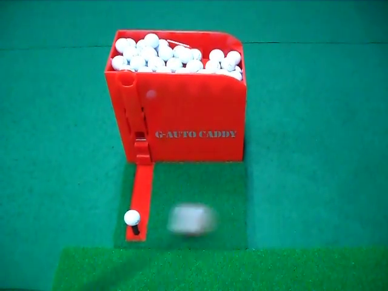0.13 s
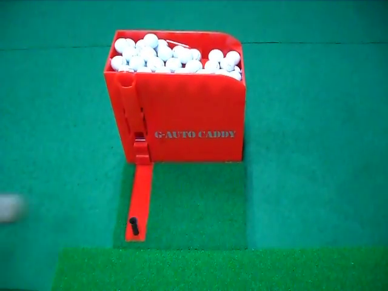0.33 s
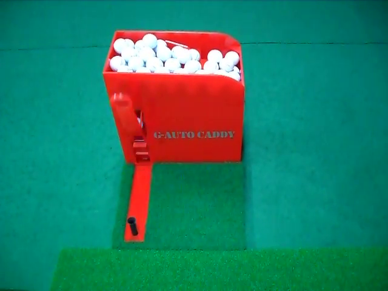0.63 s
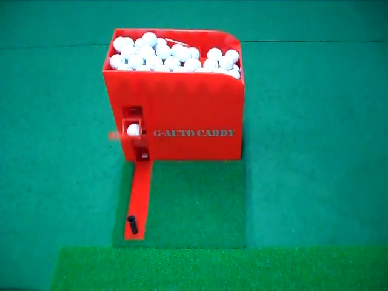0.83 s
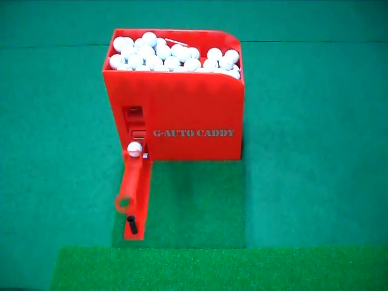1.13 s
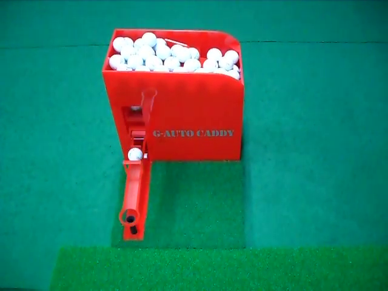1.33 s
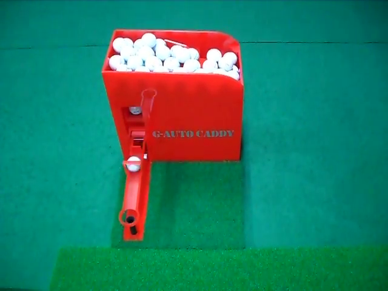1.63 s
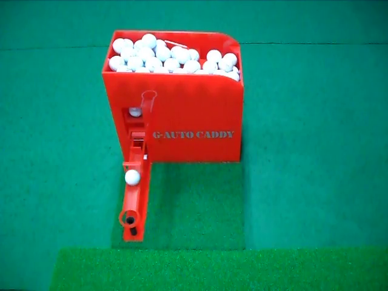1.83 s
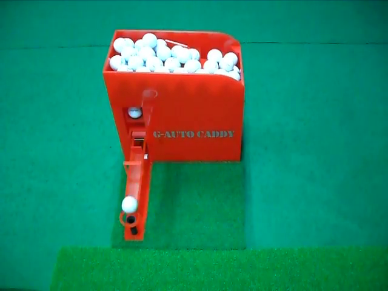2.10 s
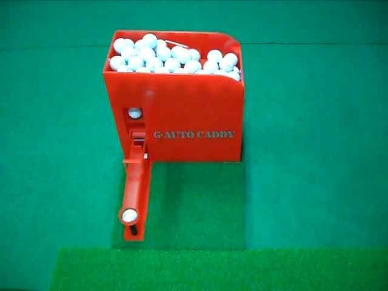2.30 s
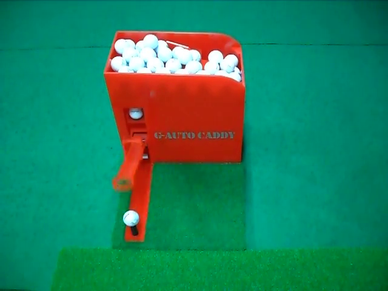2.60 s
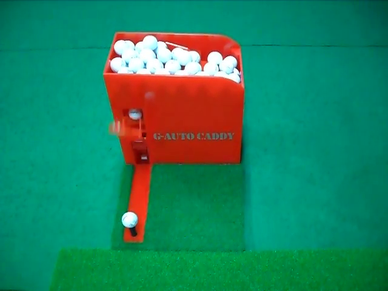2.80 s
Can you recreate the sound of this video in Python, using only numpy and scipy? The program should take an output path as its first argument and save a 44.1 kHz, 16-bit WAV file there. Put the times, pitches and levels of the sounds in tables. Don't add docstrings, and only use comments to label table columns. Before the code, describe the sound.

A golf club hits a ball with a loud, sharp crack and short metallic ring at 0.2 seconds, echoing in a hard-walled room. The ball thuds dully into a net at 0.4. A hollow plastic dispenser clunks at 0.67, its arm clatters from 1.13 to 1.5, a ball rolls faintly, bright clacks land around 2.2 to 2.3, and the returning arm rattles from 2.5, ending with a tick at 2.94. Soft hiss and low rumble continue.

```python
import sys
import numpy as np
from scipy import signal
from scipy.fft import rfft, irfft
from scipy.io import wavfile

SR = 44100
rng = np.random.default_rng(int(sys.argv[2]) if len(sys.argv) > 2 else 0)


def to_wav(sig):
    pcm = np.clip(np.atleast_2d(sig), -1, 1) * 32767
    pcm = np.round(pcm).astype(np.int16)
    wavfile.write(sys.argv[1], SR, pcm.T)


def boost(x):
    u = np.asarray(x, float) / 20
    return 10 ** u


N = 130095

# frequency in [Hz], level in [dB], t60 in [s].
SHELL_MODES = [(325, -5.5, 0.17), (401, -6.5, 0.12), (441, 1, 0.032), (545, -3, 0.098), (607, -1, 0.042),
               (761, 0, 0.04), (865, 2.5, 0.017), (953, -8, 0.13), (1148.5, -1, 0.025),
               (1367, -19.5, 0.013), (1488, -8.5, 0.037), (1744, -36, 0.013), (2227, -20, 0.044),
               (2700, -17.5, 0.01)]
# frequency in [Hz], level in [dB], t60 in [s].
BOX_MODES = [(201, -2.5, 0.14), (218.6, -2, 0.1), (263, -13.5, 0.19), (150, -22.5, 0.24), (82, -24, 0.063)]


def rms_one(x):
    return x / np.sqrt(np.mean(x ** 2) + 1e-20)


def at_hz(points, hz):
    table_hz, value = np.transpose(points)
    return np.interp(np.log(hz), np.log(table_hz), value)


def clicks(start_s, sizes):
    out = np.zeros(N)
    place = np.clip((np.asarray(start_s) * SR).astype(int), 0, N - 1)
    np.add.at(out, place, sizes)
    return out


def ring(x, hz, t60):
    r = boost(-60 / (t60 * SR))
    w = 2 * np.pi * hz / SR
    return signal.lfilter([0, np.sin(w)], [1, -2 * r * np.cos(w), r * r], x + 1e-18)


def band(x, low_hz, high_hz):
    edges_hz = [low_hz, min(high_hz, .45 * SR)]
    return signal.sosfilt(signal.butter(2, edges_hz, "band", fs=SR, output="sos"), x)


def club():
    # frequency in [Hz], level in [dB], t60 in [s].
    head_modes = [(830, -12, .01), (1200, 2, .01), (1437, -3, .012), (1780, -5, .009), (2250, -7, .01),
                  (3386, -17, .04), (3680, -6, .007), (4624, -22, .03), (5076, -6, .06), (6328, -3, .14),
                  (6350, -3, .09), (6815, -12, .05), (7730, -10, .1), (8400, -9, .01)]
    strike_s, squeeze_s = .2078, .0022
    ring_db, crack_db, body_db = -33.5, -16, -18.5
    touch = clicks([strike_s], 1.)
    release = clicks(strike_s + squeeze_s * np.array([0, .7, 1.2]), boost([-16, -11, 0]))

    low = 0
    for k, (hz, db, t60) in enumerate(head_modes[:7]):
        low = low + (-1) ** k * boost(db) * ring(release, hz, t60)
    high = 0
    for hz, db, t60 in head_modes[7:]:
        high = high + boost(db) * ring(band(touch, .9 * hz, 1.1 * hz), hz, t60)

    crack = boost(ring_db) * low + boost(crack_db) * band(release, 1000, 8000)
    body = 10 * boost(body_db) * band(release, 214, 600)
    return crack, boost(ring_db) * high, body


def net():
    # centre in [s], level in [dB], softness in [ms].
    thuds = [
        (0.4011, -22, 0.27),
        (0.417, -36.5, 0.71),
        (0.488, -44, 1.24),
        (0.412, -41, 1),
        (0.802, -49.5, 2.52),
        (1.325, -48, 2.2),
        (2.472, -54, 1.3),
    ]
    t = np.arange(N) / SR
    push = np.zeros(N)
    for centre_s, db, soft_ms in thuds:
        u = (t - centre_s) / soft_ms * 1000
        push += boost(db + 4) * u * np.exp(-.5 * u ** 2)
    push = push + boost(-29.5) * ring(push, 518, 0.011)
    return signal.sosfilt(signal.butter(6, 1280, fs=SR, output="sos"), push)


def arm():
    # start in [s], tick level in [dB], tick pitch in [Hz], shell level in [dB].
    knocks = [(.666, -39.5, 4300, -60), (.667, -41, 1630, -55), (0.6962, -47, 4530, -63),
              (0.721, -79, 4760, -55.5), (1.134, -39, 3850, -38), (1.178, -73, 3000, -48.5),
              (1.25, -60, 2500, -51), (1.339, -67, 4000, -51.5), (1.3928, -40.5, 3670, -40.5),
              (1.4277, -40, 2940, -43), (1.445, -45, 3140, -37.5), (1.4886, -42, 2300, -39),
              (1.541, -54, 1970, -67), (1.61, -58, 2000, -67), (1.934, -53, 5040, -58.5),
              (2.198, -43, 1510, -51), (2.2255, -23.5, 2970, -36), (2.247, -55, 8650, -64),
              (2.278, -28.5, 3700, -39.5), (2.279, -24.5, 1620, -50.5), (2.30, -27, 1620, -50),
              (2.46, -43.5, 2700, -44), (2.5424, -49, 3670, -37.5), (2.61, -54, 3880, -45.5),
              (2.613, -36, 372, -59), (2.651, -34.5, 324, -55.5), (2.675, -51, 352, -58),
              (2.938, -32, 6200, -64.5), (2.9366, -37, 2700, -79)]
    rattle_s, shake_s = 0.0047, 0.0083
    tick_cycles, tick_wide_db = 13, -4
    t = np.arange(int(.12 * SR)) / SR
    ticks, shake = np.zeros((2, N + len(t)))
    for start_s, tick_db, tick_hz, shell_db in knocks:
        tick_noise, shake_noise = rng.standard_normal((2, len(t)))
        burst = tick_noise * np.exp(-t / rattle_s)
        pitched = .17 * ring(burst, tick_hz, tick_cycles / tick_hz)
        wide = boost(tick_wide_db) * band(burst, .5 * tick_hz, 2.2 * tick_hz)
        swell = np.sqrt(t / shake_s) * np.exp(-t / shake_s)
        first = int(start_s * SR)
        ticks[first:first + len(t)] += .5 * boost(tick_db) * (pitched + wide)
        shake[first:first + len(t)] += boost(shell_db) * shake_noise * swell

    shell = sum(boost(db - 22) * ring(shake, hz, 0.33 * t60) for hz, db, t60 in SHELL_MODES)
    return ticks[:N], shell[:N]


def box():
    # start in [s], level in [dB].
    booms = [(0.499, -52), (0.67, -29.5), (0.718, -47.5), (0.792, -53), (1.134, -25), (1.173, -44),
             (1.24, -38), (1.334, -29), (1.398, -41), (1.445, -28), (1.49, -36.5), (1.604, -40),
             (1.646, -56), (1.872, -36.5), (2.2, -38), (2.232, -23.5), (2.28, -54.5), (2.46, -49),
             (2.519, -34.5), (2.544, -31), (2.6, -35), (2.648, -46.5), (2.939, -37)]
    start_s, db = np.transpose(booms)
    blows = clicks(start_s, boost(db - 2))
    out = np.zeros(N)
    for k, (hz, mode_db, t60) in enumerate(BOX_MODES):
        out += (-1) ** k * boost(mode_db) * ring(blows, hz, t60)
    return out


def rolling():
    # time in [s], level in [dB].
    roll_weight = [(.5, -62), (.66, -58), (0.852, -66), (1.05, -84.5), (1.5, -66), (1.66, -63.5),
                   (1.75, -60.5), (1.83, -65), (1.9, -63.5), (2.0, -57.5), (2.102, -59.5), (2.2, -58),
                   (2.3, -62), (2.5, -57), (2.7, -63.5), (2.8, -92)]
    dimples_per_s, shell_mix_db = 600, -6.5
    hits = rng.random(N) < dimples_per_s / SR
    patter = hits * rng.standard_normal(N) * boost(1.5 * rng.exponential(1, N))
    hollow = sum(boost(db) * ring(patter, hz, t60) for hz, db, t60 in BOX_MODES[:3])
    shell = sum(boost(db - hz / 150) * ring(patter, hz, t60) for hz, db, t60 in SHELL_MODES[:10])
    level_db = np.interp(np.arange(N) / SR, *np.transpose(roll_weight), left=-120, right=-120)
    return boost(level_db) * (rms_one(hollow) + boost(shell_mix_db) * rms_one(shell))


def room(x):
    # frequency in [Hz], t60 in [s].
    room_t60 = [(100, 0.37), (300, 0.45), (1000, 0.66), (3000, 0.63), (8000, 0.46)]
    gap_s = 0.0034
    t = np.arange(SR) / SR
    edges_hz = 60 * 2.0 ** np.arange(0, 8, .5)
    tail = np.zeros(SR)
    for low_hz, high_hz in zip(edges_hz, edges_hz[1:]):
        t60 = at_hz(room_t60, np.sqrt(low_hz * high_hz))
        tail += band(rng.standard_normal(SR), low_hz, high_hz) * boost(-60 * t / t60)
    tail = tail * np.clip(t / gap_s - 1, 0, 1)
    return signal.fftconvolve(x, tail / np.sqrt(np.sum(tail ** 2)))[:N]


def air():
    # frequency in [Hz], density in [dB per Hz].
    air_colour = [(20, -6.5), (35, -9), (60, -12), (110, -15.5), (200, -20.5), (400, -22.5), (1000, -25),
                  (3000, -30.5), (10000, -33.5)]
    air_db, rumble_db, hum_db = -63.5, -70.5, -75.5
    hz = np.maximum(np.arange(N // 2 + 1) * SR / N, 10)
    hiss = irfft(rfft(rng.standard_normal(N)) * boost(at_hz(air_colour, hz)), N)
    rumble = ring(rng.standard_normal(N), 26.9, 0.43)
    hum = ring(rng.standard_normal(N), 73, 0.17)
    return boost(air_db) * rms_one(hiss) + boost(rumble_db) * rms_one(rumble) + boost(hum_db) * rms_one(hum)


def scene():
    # delay in [s], level in [dB].
    echo_taps = [
        (.0088, -6),
        (.0255, -8),
        (.0395, -10),
    ]
    crack, head, body = club()
    thud = net()
    ticks, shell = arm()
    hollow = box() + rolling()

    echoes = sum(boost(db) * np.roll(crack + thud, int(delay_s * SR)) for delay_s, db in echo_taps)
    send = boost(2) * crack + body + boost(-6) * head + boost(-2) * thud
    send = send + boost(-4) * ticks + boost(-1) * shell + boost(-7) * hollow
    direct = crack + head + thud + ticks + shell + hollow
    return (direct + echoes + room(send) + air())[None]


def roll_off(x):
    return signal.sosfilt(signal.butter(12, 12060, fs=SR, output="sos"), x)


def record(dry):
    mix = signal.sosfilt(signal.butter(8, 9750, fs=SR, output="sos"), dry)
    return roll_off(mix)


dry = scene()
out = record(dry)
to_wav(out)
```